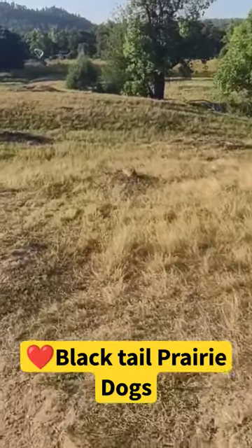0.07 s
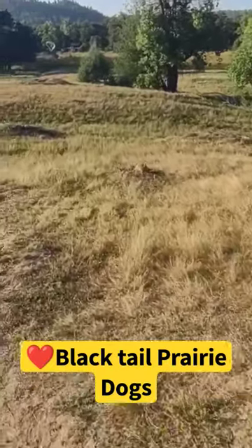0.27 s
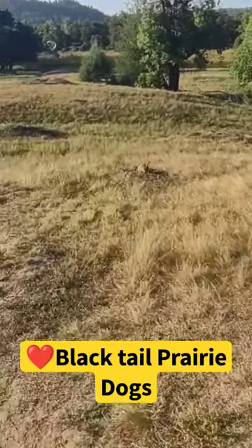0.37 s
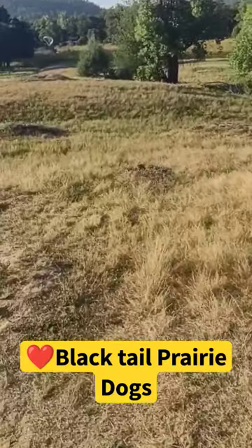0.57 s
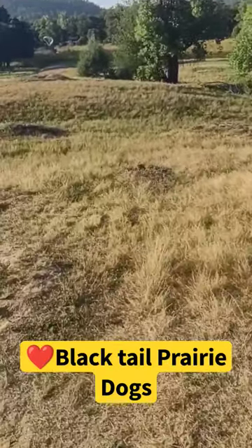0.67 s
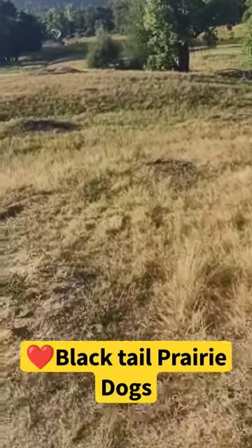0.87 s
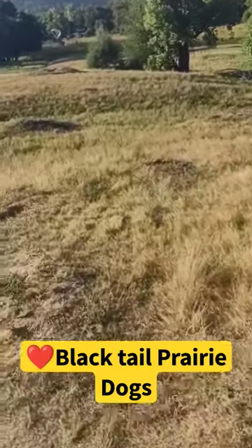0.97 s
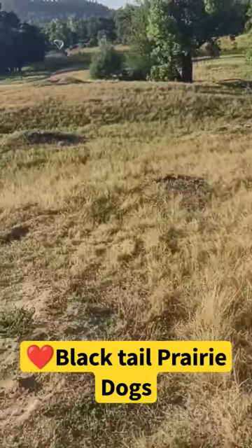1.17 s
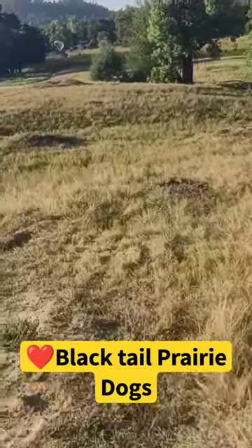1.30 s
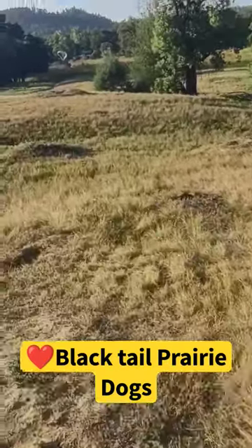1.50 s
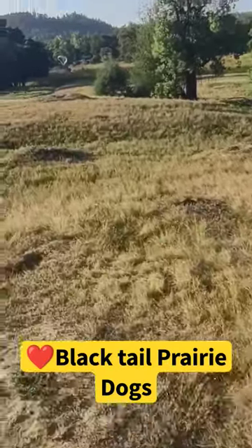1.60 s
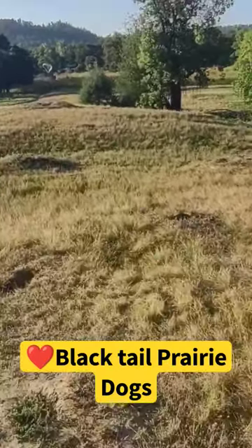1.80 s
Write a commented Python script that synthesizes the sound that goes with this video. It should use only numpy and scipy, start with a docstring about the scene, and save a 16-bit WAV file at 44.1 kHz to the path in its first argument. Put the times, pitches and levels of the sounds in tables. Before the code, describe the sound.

Two very short, high, arched prairie dog barks, at about 0.86 and 1.34 seconds, the second rougher, each with a faint smeared echo. Low wind rumbles from the start, with strong lopsided thumps on the right around 0.25-0.4, near 0.75-0.85, and weaker ones until 1.6. Dry grass rustles softly, loudest near 1.1, with small stem cracks at 0.45, 0.94 and 1.24. Wind dies away at the end.

```python
"""Prairie dog barking in a windy field

Two short arched barks are built from a warbling harmonic tone plus rasp; a faint smeared echo follows from far trees.
Wind is evened low noise on two microphone ports, and brief lopsided thumps hit the right one.
Dry grass is random ticks over hiss with brighter swishes, stems snap as decaying bursts in a resonance,
and a steady bed of coloured noise is the still air."""
import sys
import numpy as np
from scipy import signal
from scipy.fft import rfft, irfft
from scipy.io import wavfile

SR = 44100
rng = np.random.default_rng(int(sys.argv[2]) if len(sys.argv) > 2 else 0)


def store_pcm(level_fs):
    """Save levels as 16-bit WAV."""
    pcm = np.round(np.clip(level_fs, -1, 1) * 32767).astype(np.int16)
    wavfile.write(sys.argv[1], SR, np.atleast_2d(pcm).T)


N = 81585
TIME = np.arange(N) / SR


def from_db(db):
    """Decibels to gain."""
    return 10 ** (np.asarray(db) / 20)


def rms_one(x):
    """Scale to unit power."""
    return x / np.sqrt(np.mean(x ** 2) + 1e-20)


def in_time(rows):
    """Draw each column of a curve as straight lines between its points, at every sample."""
    seconds, *columns = np.transpose(rows)
    return [np.interp(TIME, seconds, column) for column in columns]


def at_hz(points, hz):
    """Read a spectrum in dB on a log-frequency axis."""
    f, db = np.transpose(points)
    return np.interp(np.log(hz + 1e-3), np.log(f), db)


def colour(x, spectrum, share=1):
    """Filter a sound by a spectrum, or by a share of its decibels."""
    size = 2 * N
    gain = from_db(share * at_hz(spectrum, np.fft.rfftfreq(size, 1 / SR)))
    return irfft(rfft(x, size) * gain, size)[..., :N]


def lowpass(x, hz):
    """Roll off the treble gently."""
    return signal.sosfilt(signal.butter(2, hz, fs=SR, output="sos"), x)


def noise(spectrum):
    """Coloured noise of unit power."""
    return rms_one(colour(rng.standard_normal(N), spectrum))


def drift(rate_hz):
    """Smooth random wandering of spread 1, no faster than about the given rate."""
    return rms_one(lowpass(rng.standard_normal(N), rate_hz))


def swells(rows):
    """Sum bell-shaped rises and falls of level, each a start-free Gaussian around its centre."""
    return sum(from_db(db) * np.exp(-((TIME - s) / width) ** 2 / 2) for s, db, width in rows)


WIND_TOP_HZ = 1300


def turbulence(spectrum, size):
    """Lumpy low noise with its power evened over a window of the given samples."""
    x = lowpass(noise(spectrum), WIND_TOP_HZ)
    window = np.hanning(size)
    power = signal.fftconvolve(np.abs(signal.hilbert(x)) ** 2 / 2, window / window.sum(), "same")
    return x / np.sqrt(np.abs(power) + 1e-2)  # the floor keeps lulls from being blown up


# Wind pressure on each port. Each row: time in seconds, pressure in dB before the layer offsets.
LEFT_GUSTS = [(0, -42), (.1, -30.5), (.17, -56.5), (.36, -31.5), (.47, -42.5), (.83, -50.5), (.94, -33),
              (1.09, -31), (1.15, -45.5), (1.41, -44), (1.85, -62)]
RIGHT_GUSTS = [(.19, -47.5), (.25, -19.5), (.38, -28), (.44, -29), (.56, -44), (.67, -30.5), (.92, -30),
               (.99, -29), (1.24, -29), (1.28, -41.5), (1.39, -30), (1.53, -46.5), (1.85, -67)]
# Deep rumble, and the rougher flutter of strong wind. Each row: frequency in Hz, relative density in dB per Hz.
RUMBLE_SPECTRUM = [(35, -19), (65, 2), (100, 6), (160, -2), (250, -14.5), (700, -48.5), (1500, -84)]
FLUTTER_SPECTRUM = [(60, -22.5), (130, -4), (220, 3.5), (330, -4.5), (500, -21), (800, -32.5), (1500, -61)]
RUMBLE_DB = 4.5  # over the pressure
STRONG_WIND_DB, FLUTTER_DB = -5.5, -15  # at this strong pressure, flutter sits this far from it
FLUTTER_GROWTH = 1.4  # dB of flutter per dB of pressure


def wind(gusts):
    """Rumble on one port follows the pressure; flutter grows faster than the pressure does."""
    db, = in_time(gusts)
    flutter_db = STRONG_WIND_DB + FLUTTER_DB + FLUTTER_GROWTH * (db - STRONG_WIND_DB)
    rumble = from_db(db + RUMBLE_DB) * turbulence(RUMBLE_SPECTRUM, size=1500)
    return rumble + from_db(flutter_db) * turbulence(FLUTTER_SPECTRUM, size=2200)


# Still air over the field. Each row: frequency in Hz, relative density in dB per Hz.
AIR_SPECTRUM = [(100, 11.5), (550, 0), (1000, -5.5), (2200, -26), (15000, -25.5)]
AIR_DB = -59.5


def still_air():
    """A steady, quiet bed of coloured noise, independent at each port."""
    return from_db(AIR_DB) * np.array([noise(AIR_SPECTRUM), noise(AIR_SPECTRUM)])


# How loud the grass rustles. Each row: time in seconds, level in dB.
RUSTLE_COURSE = [(.2, -67), (.365, -55.5), (.55, -60.5), (.9, -59.5), (.98, -52.5), (1.125, -49.5),
                 (1.15, -58), (1.6, -63), (1.85, -68)]
# Tone of the rustle. Each row: frequency in Hz, relative gain in dB.
RUSTLE_SPECTRUM = [(500, 7.5), (1000, 3), (2300, 1.5), (3500, -8.5), (5000, -13.5), (8000, -19),
                   (15000, -30.5)]
GRAINS_PER_S, GRAIN_SPREAD_DB = 1500, 6.5
GRAIN_SHARE = 0.45  # ticks' share of the power, the rest is hiss


def grass():
    """Dry blades rub: small ticks of uneven size over a soft hiss."""
    sizes = from_db(GRAIN_SPREAD_DB * np.minimum(rng.exponential(1, (2, N)), 4))
    signed = sizes * rng.choice([-1, 1], (2, N))
    ticks = rms_one(signed * (rng.random((2, N)) < GRAINS_PER_S / SR))
    hiss = rng.standard_normal((2, N))
    rub = np.sqrt(GRAIN_SHARE) * ticks + np.sqrt(1 - GRAIN_SHARE) * hiss
    level_db, = in_time(RUSTLE_COURSE)
    return from_db(level_db) * rms_one(colour(rub, RUSTLE_SPECTRUM))


# Snapping stems. Each row: start in seconds, level in dB before SNAP_DB, left over right in dB,
# centre of the resonance in Hz, its width in octaves.
STEM_SNAPS = [(.2249, -52, -3.5, 1400, 1.16), (.4468, -46, -4, 1800, 0.88), (.9443, -41, 12, 1530, 1.5),
              (0.9601, -51, -10, 1160, 0.72), (1.2439, -40.5, -6, 1130, 1.12), (1.5729, -54, -4, 1530, 0.3)]
SNAP_DB, SNAP_T60_S = 5.5, 0.018  # lift of every snap; time to fall 60 dB
SNAP_SPLINTER_DB = -32  # raw burst on top of each crack


def snaps():
    """Each stem breaks with a short dull crack in one broad resonance, with thin treble on top."""
    out = 0
    for s, db, pan_db, hz, octaves in STEM_SNAPS:
        decay = (TIME >= s) * from_db(-60 * np.abs(TIME - s) / SNAP_T60_S)
        burst = rng.standard_normal((2, N)) * decay
        band = [hz * 2 ** (-octaves / 2), hz * 2 ** (octaves / 2)]
        crack = signal.sosfilt(signal.butter(4, band, "band", fs=SR, output="sos"), burst)
        crack = crack + from_db(SNAP_SPLINTER_DB) * burst
        sides_db = pan_db * np.array([[1], [-1]]) / 2
        out = out + crack / np.abs(crack).max() * from_db(db + SNAP_DB + sides_db)
    return out


# Single eddies on the right port. Each row: centre in seconds, level in dB, swing in Hz.
EDDY_HITS = [(.259, -8, 111), (0.281, -13, 128.5), (.308, -6.5, 180), (0.349, -12.5, 252), (0.37, -15, 214),
             (0.4, -17.5, 184), (0.648, -24.5, 175), (0.745, -15, 209), (.758, -17.5, 90),
             (.839, -9.5, 172), (0.99, -20, 158), (1.064, -23, 259), (1.104, -18, 104.5),
             (1.209, -19.5, 258), (1.227, -16, 165), (1.383, -21, 140), (1.574, -38.5, 306)]
EDDY_SKEW = 0.16  # the pressure peaks are sharper than the troughs
EDDY_SWINGS, EDDY_FLUTTER_DB = 0.59, -7  # swings per half length; flutter re the thump


def eddies():
    """Brief lopsided thumps of two or three swings, longer the lower they are, with some flutter on top."""
    out, flutter = 0, turbulence(FLUTTER_SPECTRUM, size=450)
    for (s, db, hz), turn in zip(EDDY_HITS, rng.random(len(EDDY_HITS))):
        swing = 2 * np.pi * (hz * (TIME - s) + turn)
        thump = np.sqrt(2) * (np.cos(swing) + EDDY_SKEW * np.cos(2 * swing))
        envelope = swells([(s, db, EDDY_SWINGS / hz)])
        out = out + envelope * (thump + from_db(EDDY_FLUTTER_DB) * flutter)
    return out


# Brighter swishes of grass. Each row: centre in seconds, level in dB, half length in seconds.
GRASS_SWISHES = [(.365, -64, 0.0096), (.555, -63.5, 0.042), (1.115, -58, 0.0086)]
# Tone of the swishes. Each row: frequency in Hz, relative density in dB per Hz.
SWISH_SPECTRUM = [(3200, -14.5), (4500, -10), (6500, -20.5), (15000, -26.5)]


def swishes():
    """Grass sweeps by as bright noise under bell-shaped swells, independent at each port."""
    return swells(GRASS_SWISHES) * np.array([noise(SWISH_SPECTRUM), noise(SWISH_SPECTRUM)])


# Throat and mouth resonances. Each row: frequency in Hz, relative gain in dB.
THROAT_GAIN = [(900, -9), (1400, -7), (1850, -1), (2200, -3.5), (3000, -4.5), (4400, 9), (5300, -12),
               (6400, 2.5), (7800, -24), (8600, -30.5), (13500, -35), (15500, -41)]
# The rasp around the tonal lines. Each row: frequency in Hz, relative density in dB per Hz.
RASP_SPECTRUM = [(1500, -13.5), (2200, 2), (3300, -8), (5300, 3), (6400, 4.5), (7800, -21.5), (8600, -2.5),
                 (9800, -31.5), (13500, -18), (15500, -34.5)]
ATTACK_S, RELEASE_S = 0.0011, 0.0019
JITTER, JITTER_PER_S = 0.013, 420  # share of pitch, rate in Hz
SHIMMER_DB, SHIMMER_PER_S = 4, 74  # wander of each line's level, rate in Hz
WARBLE_HZ, WARBLE_WANDER = 388, .2  # a second, slower vibration of the throat; its share of wander
WARBLE_DEPTH = 0.13  # share of pitch at a roughness of 0 dB
QUARTER_DB = -9.5  # lines at quarter steps of the pitch, below those at half steps
BLUR_FROM_HZ, BLUR_RADIANS, BLUR_PER_S = 7400, .45, 700


def bark(course, bright_db, between_db):
    """A warbling arched tone through the throat, weak lines between harmonics, and rasp pulsed by each cycle."""
    pitch, db, rough_db = in_time(course)
    start, end = course[0][0], course[-1][0]
    attack = (np.minimum(TIME - start, 0) / ATTACK_S) ** 2
    release = np.maximum(TIME - end, 0) / RELEASE_S
    gate = np.exp(-attack - release)
    warble_hz = WARBLE_HZ * (1 + WARBLE_WANDER * drift(SHIMMER_PER_S))
    warble = np.sin(2 * np.pi * np.cumsum(warble_hz) / SR)
    bend = JITTER * drift(JITTER_PER_S) + WARBLE_DEPTH * from_db(rough_db) * warble
    phase = 2 * np.pi * np.cumsum(pitch * (1 + bend)) / SR
    voice, power = 0, 0
    for k in np.arange(2, 29) / 4:  # multiples of the pitch, in quarter steps
        line_db = at_hz(THROAT_GAIN, k * pitch) + bright_db * np.log2(k)
        line_db = line_db + between_db * (k % 1 > 0) + QUARTER_DB * (k % .5 > 0)
        gain = from_db(line_db + SHIMMER_DB * drift(SHIMMER_PER_S))
        # random phase blurs the top lines
        blur = BLUR_RADIANS * drift(BLUR_PER_S) * (k * pitch.max() > BLUR_FROM_HZ)
        voice = voice + gain * np.sin(k * phase + blur)
        power = power + gain ** 2 / 2
    rasp = from_db(rough_db) * rms_one(noise(RASP_SPECTRUM) * (1 + np.cos(phase) / 2))
    return gate * from_db(db) * (voice / np.sqrt(power) + rasp)


def scatter(x, delay_s, t60_s):
    """Many small reflections that start after a delay and die away, different at each port."""
    age = TIME - delay_s
    response = rng.standard_normal((2, N)) * (age > 0) * from_db(-60 * np.abs(age) / t60_s)
    return signal.fftconvolve(x[None], rms_one(response) / np.sqrt(N))[:, :N]


# Course of each bark. Each row: time in seconds, pitch in Hz, level of the tone in dB,
# roughness in dB re the tone.
BARK_ONE = [(0.857, 1716, -44, -19.5), (0.867, 1983, -33, -21), (0.878, 2180, -30.5, -16.5),
            (0.894, 2170, -25.5, -23), (0.903, 2011, -34, -16), (0.908, 1940, -42, -15)]
BARK_TWO = [(1.339, 2000, -38, -11), (1.349, 2226, -24, -13), (1.361, 2340, -25, -16.5),
            (1.374, 2087, -25, -10.5), (1.384, 2040, -30.5, -8), (1.391, 1830, -40.5, -3)]
# Left port over right for the animal's direction. Each row: frequency in Hz, difference in dB.
PORT_SHADING = [(2200, 3), (4400, -9), (6300, -1), (10000, 13.5), (14000, 5.5)]
RIGHT_LATE_S = .00032
NEAR_DB, NEAR_DELAY_S, NEAR_T60_S = -18, 0.0015, .06
ECHO_DB, ECHO_DELAY_S, ECHO_T60_S, ECHO_DULL_HZ = -36, 0.096, 0.44, 5740
ECHO_BLUR_HZ = 300  # leaves in motion flutter the echo's level, which smears its pitch


def prairie_dog():
    """Both barks reach the left port first, followed by scatter from near grass and far trees."""
    # bright_db tilts the tone per octave; between_db sets the lines between harmonics
    voice = bark(BARK_ONE, bright_db=3, between_db=-10)
    voice = voice + bark(BARK_TWO, bright_db=-2.5, between_db=-26.5)
    left = colour(voice, PORT_SHADING, .5)
    right = np.roll(colour(voice, PORT_SHADING, -.5), round(RIGHT_LATE_S * SR))
    near = scatter(voice, NEAR_DELAY_S, NEAR_T60_S)
    echo = scatter(lowpass(voice, ECHO_DULL_HZ), ECHO_DELAY_S, ECHO_T60_S)
    echo = echo * (1 + drift(ECHO_BLUR_HZ) / 2)
    return np.array([left, right]) + from_db(NEAR_DB) * near + from_db(ECHO_DB) * echo


def scene():
    """The animal, the grass and the air, with wind on each port and eddies on the right."""
    ports = np.array([wind(LEFT_GUSTS), wind(RIGHT_GUSTS) + eddies()])
    return ports + still_air() + grass() + snaps() + swishes() + prairie_dog()


LOW_CUT_HZ, CUTOFF_HZ = 39, 15550


def record(dry):
    """The deepest rumble is filtered out and the top is cut steeply."""
    thinned = signal.sosfilt(signal.butter(2, LOW_CUT_HZ, "high", fs=SR, output="sos"), dry)
    return signal.sosfilt(signal.ellip(12, .1, 80, CUTOFF_HZ, fs=SR, output="sos"), thinned)


dry = scene()
out = record(dry)
store_pcm(out)
```